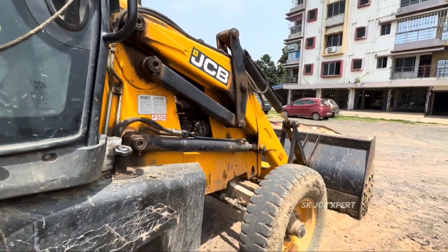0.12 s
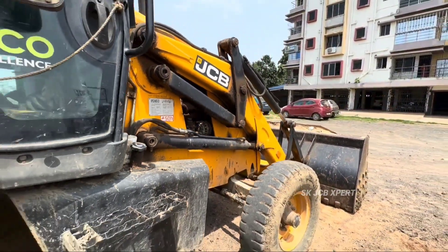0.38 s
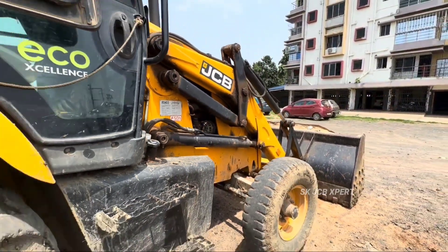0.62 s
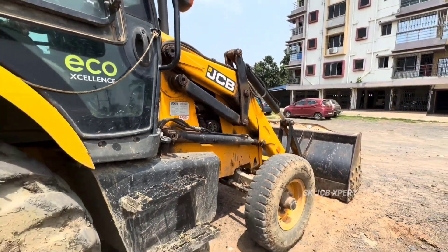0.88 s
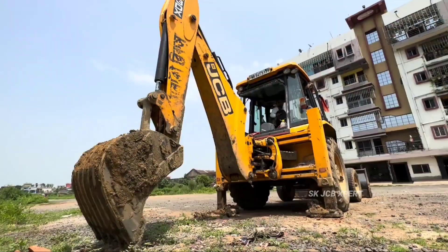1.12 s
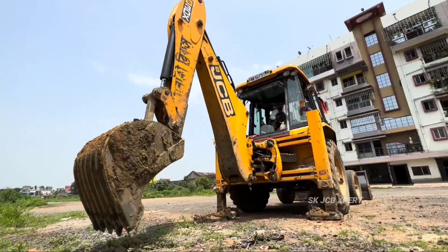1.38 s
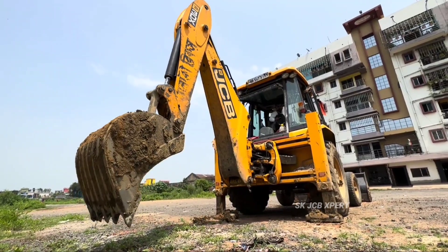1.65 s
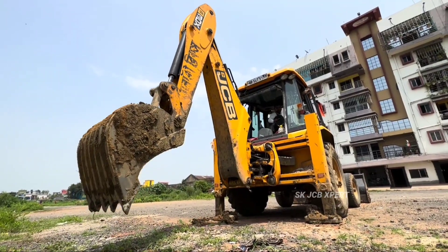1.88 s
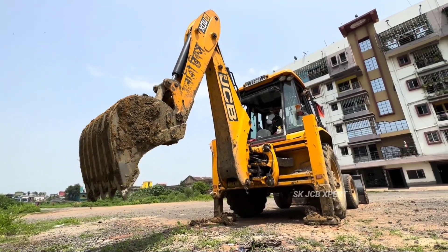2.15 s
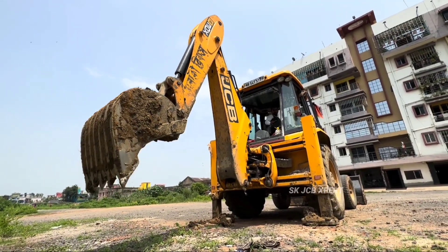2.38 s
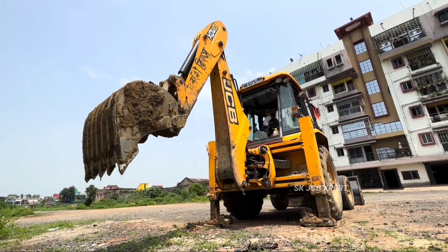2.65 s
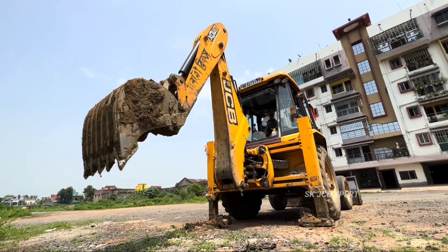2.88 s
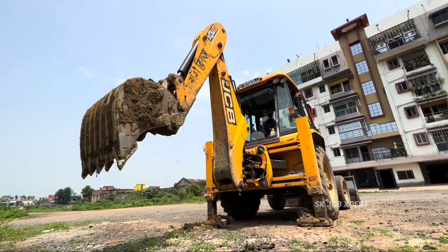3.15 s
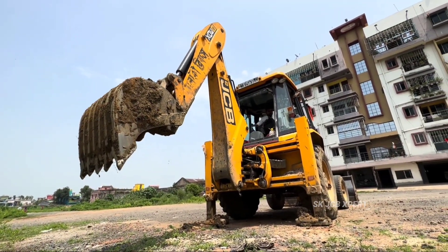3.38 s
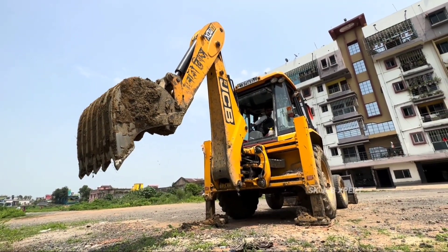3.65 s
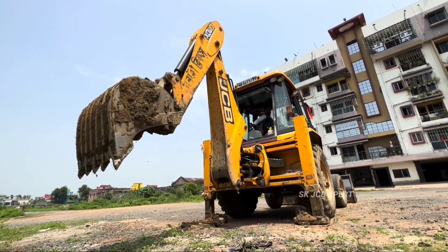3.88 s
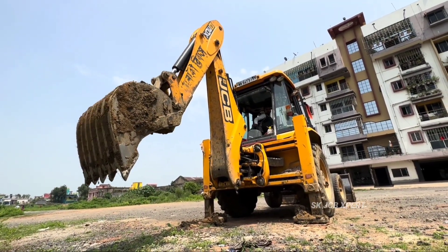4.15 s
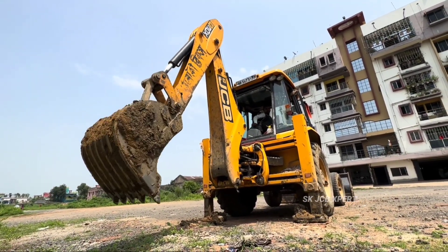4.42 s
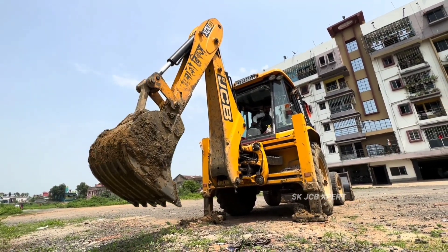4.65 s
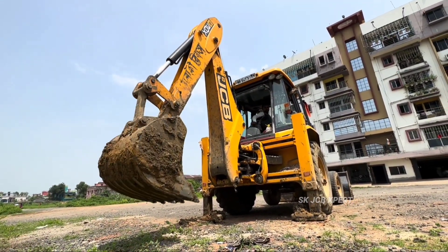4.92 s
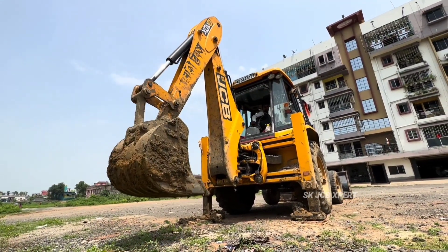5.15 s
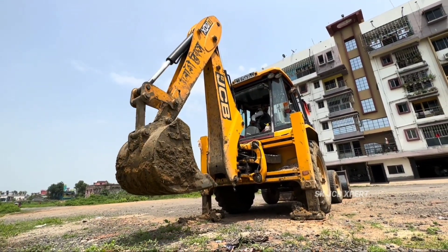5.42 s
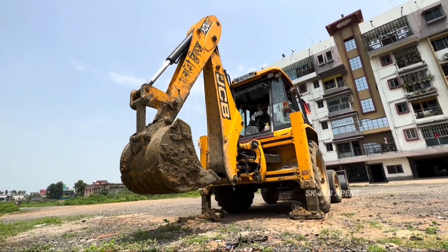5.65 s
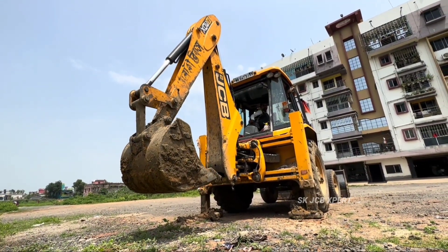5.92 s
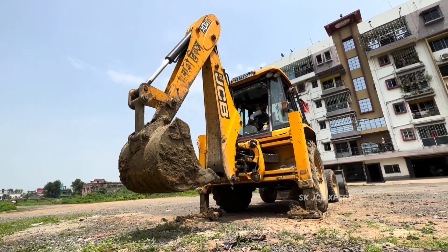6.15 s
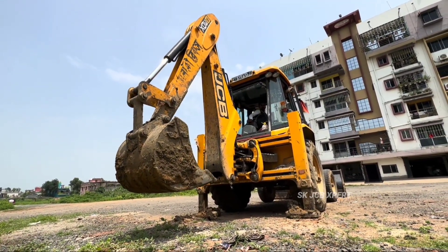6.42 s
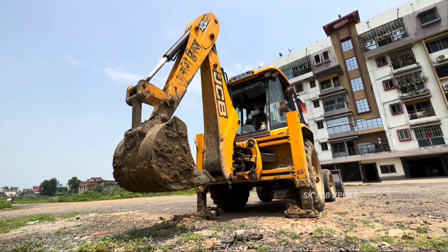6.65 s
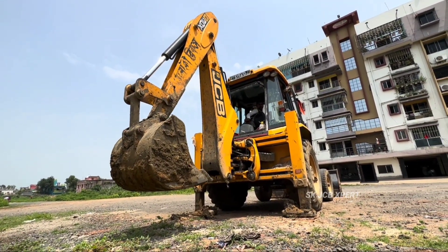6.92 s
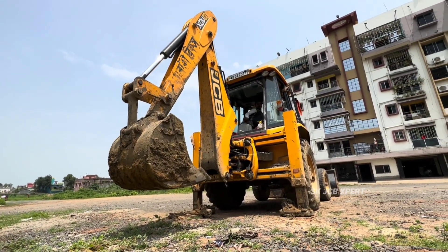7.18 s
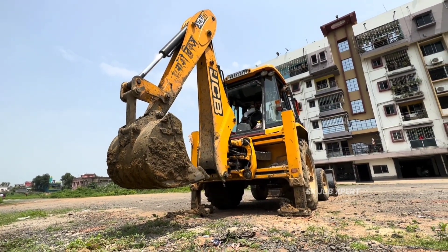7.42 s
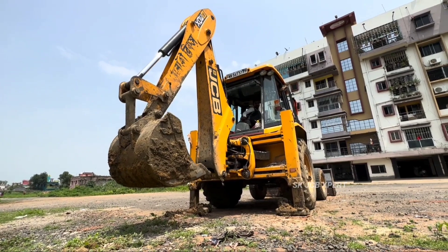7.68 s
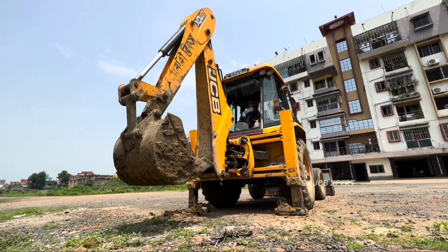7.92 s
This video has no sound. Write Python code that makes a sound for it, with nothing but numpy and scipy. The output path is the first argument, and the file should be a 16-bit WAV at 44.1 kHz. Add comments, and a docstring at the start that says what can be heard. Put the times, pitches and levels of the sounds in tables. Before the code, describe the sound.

Outdoor stereo sound of a diesel backhoe on an open lot. First a close, clattery idle, then a sudden switch to a boomy exhaust drone under load. A tumbling run of muddy steel clangs follows, ending in a short squeak. The engine immediately turns quieter and slightly faster, with a throbbing hydraulic hum for under a second, then steady idling, soft thuds, one pin clink and very faint high chirps.

```python
"""Diesel digger dropping its bucket

A four-cylinder digger idles on an open lot, heard beside the engine bay and, after a cut, from behind.
The exhaust is a stack of crank-locked tones, louder and slower while the arm lifts; the block is
noise puffed up by each firing, plus panels that ring once a cycle. The bucket bangs as noise bursts
through steel modes and rattles; a throbbing tone hums in the hydraulics; decaying sines make rings,
squeaks, thuds, a pin's clink and faint high chirps."""
import sys
import numpy as np
from scipy import signal
from scipy.fft import rfft, irfft, next_fast_len
from scipy.io import wavfile
from scipy.ndimage import uniform_filter1d

SR = 44100
rng = np.random.default_rng(int(sys.argv[2]) if len(sys.argv) > 2 else 0)


def to_wav(s):
    """Save 16-bit WAV."""
    ch = np.atleast_2d(s).T  # columns
    pcm = np.round(np.clip(ch, -1, 1) * 32767)  # PCM
    wavfile.write(sys.argv[1], SR, pcm.astype(np.int16))


def gain_from_db(level_db):
    """Convert decibel levels to linear amplitude factors (20 dB per decade)."""
    decades = np.asarray(level_db, float) / 20
    return 10 ** decades


N = 355005
T = np.arange(N) / SR
FFT_SIZE = next_fast_len(N)
BINS = np.maximum(np.fft.rfftfreq(FFT_SIZE, 1 / SR), 1)  # Hz
CYCLE = 4  # firings per engine cycle


def over_hz(rows):
    """A (hz, value) table on the frequency bins, straight between points on a log axis."""
    hz, value = np.transpose(rows)
    return np.interp(np.log(BINS), np.log(hz), value)


def shaped(x, gain):
    """Filter by a gain per frequency bin."""
    return irfft(rfft(x, FFT_SIZE) * gain, FFT_SIZE)[..., :N]


def ring(x, hz, width_hz):
    """Two-pole resonance, gain 1 at the centre."""
    return signal.lfilter(*signal.iirpeak(hz, hz / width_hz, SR), x)


def level(x, rms_db):
    """Set the rms."""
    return x * gain_from_db(rms_db) / np.sqrt(np.mean(x ** 2))


def per_firing(crank, every=1):
    """A random value with a new target once in so many firings, gliding between targets."""
    return np.interp(crank / every, np.arange(400), rng.standard_normal(400))


def partial(s, hz, db, attack_s, t60_s, waver):
    """One ringing partial that swells briefly and dies, its pitch wavering at random."""
    out, i = np.zeros(N + SR), int(s * SR)
    t = T[:SR // 2]
    wobble = np.cumsum(uniform_filter1d(rng.standard_normal(len(t)), size=200)) * hz * waver
    envelope = gain_from_db(db - 60 * t / t60_s) * np.minimum(t / attack_s, 1)
    out[i:i + len(t)] = envelope * np.sin(2 * np.pi * hz * t + wobble)
    return out[:N]


# faint high chirps: start_s, pitch_hz, level_db
CHIRPS = [(7.265, 8750, -52), (7.33, 8800, -48), (7.424, 8900, -47)]


def chirps():
    """Faint, softly swelling high partials."""
    return sum(partial(s, hz, db, .011, 0.12, 2.5e-5) for s, hz, db in CHIRPS)


# dull thuds in the frame: start_s, pitch_hz, level_db, t60_s
THUDS = [(3.247, 197, -16.5, 0.2), (5.02, 200, -26.5, 0.59), (5.975, 147, -19.5, 0.13)]


def thuds():
    """Low partials with a soft attack."""
    return sum(partial(s, hz, db, 0.0071, t60_s, 8e-6) for s, hz, db, t60_s in THUDS)


# modes of the one pin that clinks: pitch_hz, level_db, t60_s
PIN = [(1643, -29, 0.048), (3240, -39.5, 0.17), (3402, -51, .3), (4802, -46, 0.068), (6400, -44, 0.052)]
PIN_S = 5.981


def pin_clink():
    """All modes of the pin start together, each dying at its own pace."""
    return sum(partial(PIN_S, hz, db, 0.0013, t60_s, 8e-6) for hz, db, t60_s in PIN)


# squeaks of the joints: start_s, pitch_hz, level_db, upper_pitch_hz, upper_level_db
SQUEAKS = [(3.228, 5240, -28, 7300, -42), (3.393, 5770, -38, 6400, -46)]


def squeaks():
    """Two high partials per squeak, the upper one speaking sooner."""
    out = 0
    for s, hz, db, upper_hz, upper_db in SQUEAKS:
        out = out + partial(s, hz, db, 0.013, 0.056, 1.2e-5)
        out = out + partial(s, upper_hz, upper_db, .006, .06, 1.2e-5)
    return out


# broad ticks of contact with squeak and clink: start_s, level_db (before the filter), t60_s
TICKS = [(3.228, -39.5, 0.1), (5.98, -41, .05)]


def ticks():
    """Short swells of broad, bright noise."""
    envelope = 0
    for s, db, t60_s in TICKS:
        decay = gain_from_db(db - 60 * np.clip(T - s, 0, 1) / t60_s)
        envelope = envelope + decay * np.clip((T - s) / 0.0088, 0, 1)
    return envelope * ring(rng.standard_normal(N), 9000, 16000)


# clear rings of the bucket among the blows: start_s, pitch_hz, level_db
RINGS = [(2.863, 2130, -18), (2.954, 1720, -24), (2.953, 1100, -20), (3.016, 1540, -23.5)]


def bucket_rings():
    """Fast-attack partials that stand out of the bangs."""
    return sum(partial(s, hz, db, 0.0014, 0.06, 2e-5) for s, hz, db in RINGS)


FLOW_START_S, FLOW_END_S = 3.39, 4.16


def flowing():
    """1 while oil flows through the hoses, with soft ends."""
    return uniform_filter1d(((T > FLOW_START_S) & (T < FLOW_END_S)) * 1., size=3000)


PUMP_ORDER = 12  # multiple of the firing rate
HUM_DB, HUM_LOW_DB = -38.5, -2.5  # rms at the throb's top; octave below relative to the tone
THROB_HZ, THROB_DB, THROB_TOP_S = 3.48, 7.5, 3.52  # rate, depth, time of one top


def hum(crank):
    """Pump pulsation in the hoses: a throbbing, uneven tone and the octave below."""
    phase = 2 * np.pi * PUMP_ORDER * crank + 0.33 * per_firing(crank, every=1.5)
    dip_db = THROB_DB * np.sin(np.pi * THROB_HZ * (T - THROB_TOP_S)) ** 4
    dip_db += 2.0 * per_firing(crank, every=1.1)
    tone = gain_from_db(-dip_db) * np.sin(phase)
    octave_below = gain_from_db(HUM_LOW_DB) * np.sin(phase / 2)
    return flowing() * np.sqrt(2) * gain_from_db(HUM_DB) * (tone + octave_below)


# bucket blows, before dulling and panning:
# start_s, peak_db (of the body), treble_db (crack relative to the body), rattle_s (decay time)
BLOWS = [(2.863, -11.5, -10.5, 0.023), (2.892, -15, -24, 0.019), (2.951, -16.5, -28, 0.016),
         (2.975, -15, -14, 0.025), (3.014, -16.5, -29, 0.016), (3.04, -21.5, -20, 0.014),
         (3.061, -23.5, -21, 0.016), (3.102, -21.5, -15.5, 0.03), (3.183, -23, -17, 0.027),
         (3.23, -22.5, -11, 0.055)]
# the bucket's strongest modes: pitch_hz, level_db (relative, scattered per blow), t60_s
BUCKET = [(154, -14, 0.18), (200, 1, 0.16), (265, -3, 0.17), (448, -6, 0.51), (690, -4, 0.14),
          (1004, -4.5, 0.18), (1529, -20, 0.057), (1820, -8, 0.083), (2150, -26, 0.046),
          (2260, -18.5, 0.043), (2972, -31, 0.037)]
PLATE_DB = -5  # the many plate modes, relative to the outline of the strong ones
# loose parts: level for a 0 dB blow, dB per dB of blow, decay
LOOSE_DB, LOOSE_FOLLOWS, LOOSE_T60_S = -24, 0.5, 0.13


def bucket_modes():
    """Levels and decaying sines of the strong modes and of 160 weaker plate modes between them."""
    t = np.arange(SR // 3) / SR
    hz, db, t60_s = np.transpose(BUCKET)
    plate_hz = np.sort(hz[0] * (hz[-1] / hz[0]) ** rng.random(size=160) ** 0.53)
    all_db = np.append(db, np.interp(plate_hz, hz, db) + PLATE_DB)
    all_t60_s = np.append(t60_s, np.interp(plate_hz, hz, t60_s))
    sines = np.sin(2 * np.pi * np.outer(np.append(hz, plate_hz), t))
    return all_db, sines * gain_from_db(-60 * t / all_t60_s[:, None])


def loose_rattle():
    """Loose pins and dirt: grainy noise that jumps up with each blow and dies."""
    grain_db = 2.2 * np.repeat(rng.exponential(size=N // 100 + 1), 100)[:N]
    grains = rng.standard_normal((2, N)) * gain_from_db(grain_db)
    loose = ring(ring(grains, 450, 750), 600, 1800)
    power = 0
    for s, peak_db, *_ in BLOWS:
        decay_db = 60 * np.clip(T - s, 0, 1) / LOOSE_T60_S
        power = power + (T > s) * gain_from_db(LOOSE_DB + LOOSE_FOLLOWS * peak_db - decay_db) ** 2
    return level(loose, 0) * np.sqrt(power)


def bucket():
    """Each blow is a burst of rattling contact that rings the bucket, with a crack of treble."""
    n = SR // 3
    t = np.arange(n) / SR
    mode_db, modes = bucket_modes()
    out = np.zeros((2, N + n))
    for s, peak_db, treble_db, rattle_s in BLOWS:
        push = rng.standard_normal((2, n)) * np.exp(-t / rattle_s) * np.minimum(t / 0.001, 1)
        body = gain_from_db(mode_db + 3 * rng.standard_normal(len(mode_db))) @ modes
        late_push = push * np.minimum(t / 0.0086, 1)  # the body answers late
        rung = signal.fftconvolve(late_push, body[None])[:, :n]
        rung /= np.abs(rung[0]).max()
        crack = ring(ring(push, 2000, 3700), 2100, 5000)
        crack /= np.abs(crack[0]).max()
        i = int(s * SR)
        out[:, i:i + n] += gain_from_db(peak_db) * (rung + gain_from_db(treble_db) * crack)
    mud = signal.butter(2, 5000, fs=SR, output="sos")  # mud on the steel dulls the top
    return signal.sosfilt(mud, out[:, :N] + loose_rattle())


# panels that one cylinder or valve rings once a cycle, beside and behind:
# pitch_hz, pitch_spread_hz, rms_db (before load and panning), place_firings (in the cycle), length_firings
KNOCK_SIDE = [(2660, 120, -53, 2.15, 0.21), (2360, 83, -54, 0.13, 0.22), (693, 43, -53, 1.3, 0.42),
              (1320, 70, -62, 0.11, 0.2), (1840, 120, -54, 1.8, 0.33), (4310, 150, -65.5, 2.4, 0.3),
              (462, 36, -51.5, 2.93, 0.99), (1044, 60, -52, 0.97, 0.58)]
KNOCK_REAR = [(1002, 17, -49.5, 2.87, 1), (2137, 57, -61, 0.065, 0.29), (689, 50, -57, 0.29, 0.66),
              (663, 50, -60.5, 1.1, 0.4), (726, 50, -56.5, 1.95, 0.48), (4290, 150, -72.5, 0.11, 0.37),
              (5720, 140, -75, 1.8, 0.31), (3340, 160, -77, 2.3, 1), (1170, 170, -62.5, 0.055, 0.4),
              (1650, 49, -61.5, 2.5, .3)]


def knocks(crank, panels):
    """Once a cycle each panel rings up and dies, its pitch a little different every time."""
    out = np.zeros((2, len(crank)))
    for hz, spread_hz, rms_db, place, length in panels:
        turn, since = np.divmod(crank - place + CYCLE, CYCLE)
        chance = rng.standard_normal((400, 4))[turn.astype(int)].T  # size, pitch, two phases
        burst = since / length * np.exp(-2 * since / length) * gain_from_db(3.1 * chance[0])
        turns = (hz + spread_hz * chance[1] / 2) * T[:len(crank)] + chance[2:]
        out += level(burst * np.sin(2 * np.pi * turns), rms_db)
    return out


def cyclic(crank, share):
    """Noise of which a share repeats every engine cycle, as the same parts strike in the same order."""
    steps = 1360  # per firing
    pattern = rng.standard_normal((2, CYCLE * steps))[:, (crank % CYCLE * steps).astype(int)]
    return np.sqrt(share) * pattern + np.sqrt(1 - share) * rng.standard_normal((2, N))


# colour of clatter, fan and rumble between the tones, beside and behind: freq_hz, density_db (per Hz, relative)
BLOCK_SIDE = [(18, -25), (45, -29), (95, -12), (150, -7), (315, -9), (398, -17.5), (559, -8.5),
              (871, -15.5), (1290, -9), (2120, -18), (2700, -23), (3500, -29.5), (9600, -39), (15400, -40)]
BLOCK_REAR = [(18, -26), (40, -15.5), (85, -6.5), (144, -8.5), (270, -13), (480, -23.5), (849, -24.5),
              (1050, -22.5), (2010, -28.5), (2300, -26), (2800, -35.5), (3400, -42), (9600, -51),
              (15400, -57)]
BLOCK_SIDE_DB, BLOCK_REAR_DB = -36.5, -34  # rms before puffs, rumble lift and panning
# resonances of block and covers on that colour, beside and behind: freq_hz, width_hz, lift_db
RING_SIDE = [(724, 110, 4), (1370, 240, -0.5), (2590, 250, 9.5), (4540, 60, -2), (4720, 210, 5),
             (5660, 110, 4)]
RING_REAR = [(593, 170, 3), (890, 78, -3), (998, 40, 6.5), (1145, 35, 4.5), (1650, 130, 0.5),
             (2090, 200, -9), (2160, 35, 12), (2205, 31, -3.5), (4260, 25, 4), (5610, 70, 10.5),
             (6330, 120, 4)]


def clatter(crank, colour, rings, rms_db, low_db, depth, scatter_db, alike):
    """Octave bands of noise that each firing puffs up, most around 1900 Hz, every band by its own chance."""
    colour_db = over_hz(colour)
    for hz, width_hz, lift_db in rings:
        colour_db = colour_db + lift_db / (1 + (2 * (BINS - hz) / width_hz) ** 2)
    # the rumble never repeats; the clatter above it partly does
    rumble, strikes = rfft(cyclic(crank, 0), FFT_SIZE), rfft(cyclic(crank, alike), FFT_SIZE)
    noise = np.where(BINS < 400, rumble, strikes) * gain_from_db(colour_db)
    puff = np.exp(-((crank - .08) % 1) / .28)
    puff = uniform_filter1d(puff / puff.mean(), size=160)
    out = 0
    for octave in range(9):
        hz = 50 * 2 ** octave
        window = np.cos(np.pi / 2 * np.clip(np.log2(BINS / hz), -1, 1)) ** 2
        band = irfft(noise * window, FFT_SIZE)[:, :N]
        share = depth * np.exp(-.5 * (np.log2(hz / 1900) / 2.33) ** 2)
        chance = gain_from_db(scatter_db * per_firing(np.floor(crank - .08))) ** 2
        gain = np.sqrt(1 - share + share * puff * chance)
        drift_db = 0.73 * per_firing(crank, every=3.5)
        out = out + band * gain * gain_from_db(low_db * (hz < 350) + drift_db)
    return out * gain_from_db(rms_db) / np.std(irfft(noise[0], FFT_SIZE))


# stereo width, beside and behind: freq_hz, side_minus_mid_db
WIDTH_SIDE = [(60, -20), (110, -13), (200, -21), (380, -7), (700, -5), (1290, -3), (2380, -2.5), (4390, 1),
              (8100, -1), (10300, 4), (15000, -7.5)]
WIDTH_REAR = [(60, -6.5), (110, -7), (200, -13.5), (380, -4.5), (700, -4.5), (1290, 0), (2380, -2.5),
              (4390, 0), (8100, -1.5), (10300, 4), (12500, 8), (15000, -18)]
# stereo balance, beside and behind: freq_hz, left_minus_right_db
PAN_SIDE = [(60, -7), (110, 8), (200, -5), (380, 1), (700, 4.5), (1290, 2), (2380, -2), (4390, 2),
            (8100, -1), (15000, -1)]
PAN_REAR = [(60, 3), (110, 2), (200, -4), (380, -1.5), (700, -4.5), (1290, -3.0), (2380, -1.5), (4390, 3),
            (8100, -2.5), (15000, -1)]


def spread(mid, side, width, pan, lead):
    """Left and right from shared and unshared sound; lead (-1..1) turns the left ahead in phase."""
    lead = lead / np.sqrt(1 + BINS / 2500)  # fades toward the treble
    width_gain = gain_from_db(over_hz(width))
    side = shaped(side, np.sqrt(1 - lead ** 2) * width_gain) + shaped(mid, 1j * lead * width_gain)
    return shaped(np.array([mid + side, mid - side]), gain_from_db(np.outer([.5, -.5], over_hz(pan))))


# exhaust and engine tones: order (multiple of the firing rate)
ORDERS_HEARD = [1, 1.5, 1.75, 2, 2.5, 2.75, 3, 3.5, 4, 5, 6, 8, 9.75, 10, 15.4, 18]
# their rms levels, one row per order: beside_db, behind_loaded_db, behind_idle_db
ORDERS_DB = [(-52, -46, -47), (-60, -54, -56), (-56, -57, -57), (-45, -27, -31), (-52, -44, -45),
             (-55, -47, -49), (-35, -21, -32), (-52, -38, -50), (-47, -54, -58), (-51, -44, -46),
             (-51, -36, -51), (-65, -57, -47), (-64, -50, -51), (-55, -62, -54), (-68, -53, -64),
             (-68, -57, -64)]


def exhaust(crank, order_db, scatter_db, lag):
    """Steady tones on the crank; uneven firings make each waver, the right side lag radians ahead."""
    out = 0
    for order, db in zip(ORDERS_HEARD, order_db):
        # these offsets against order 2 leave two crests and a dip per firing
        phase = 2 * np.pi * order * crank + 1.27 * abs(order - 2) + .45 * (order > 2)
        phase += 0.064 * per_firing(crank, every=1.9)
        size = np.sqrt(2) * gain_from_db(db + scatter_db * per_firing(crank, every=0.98))
        out = out + size * np.cos(phase + np.array([[-lag], [lag]]) / 2)
    return out


CUT_S = 1.219
IDLE_HZ = 32.18  # firing rate beside the engine
START_SIDE, START_REAR = 3.53, 3.332  # place in the cycle where each view begins, firings


def beside_engine():
    """The view beside the engine bay: exhaust, clatter and knocks at a steady idle."""
    crank = START_SIDE + IDLE_HZ * T
    early, pad = crank[T < CUT_S], ((0, 0), (0, np.sum(T >= CUT_S)))
    tones = exhaust(early + 0.415, np.array(ORDERS_DB)[:, 0], scatter_db=1.6, lag=0.035)
    block = clatter(crank, BLOCK_SIDE, RING_SIDE, BLOCK_SIDE_DB, 0, depth=0.59, scatter_db=0.9, alike=0.52)
    block += np.pad(knocks(early, KNOCK_SIDE), pad)
    return np.pad(tones, pad) + spread(*block, WIDTH_SIDE, PAN_SIDE, lead=.6)


# engine speed behind: sags under load, overshoots when the load drops, settles at idle: time_s, firing_hz
SPEED = [(1.22, 30.801), (2.75, 30.651), (3.1, 30.097), (3.42, 32.999), (3.8, 32.79), (4.3, 32.361),
         (7.2, 32.361), (8.06, 32.196)]
# the lift ends; its load falls within this time to a share (0-1) that lasts while oil still flows
LIFT_ENDS_S, UNLOAD_S, FLOW_LOAD = 3.23, 0.063, .12
# rumble in the octave bands below 350 Hz: lift at the first blow, its decay time, lift while oil flows
JOLT_DB, JOLT_S, FLOW_RUMBLE_DB = 13, 0.39, 0.5


def behind_digger():
    """The view from behind: load slows the engine, raises or lowers each order and softens the knocks."""
    firing_hz = np.interp(T, *np.transpose(SPEED)) * (T > SPEED[0][0])
    crank = START_REAR + np.cumsum(firing_hz) / SR
    load = np.clip(1 - (T - LIFT_ENDS_S) / UNLOAD_S, 0, 1)
    load = np.maximum(load, FLOW_LOAD * (T < FLOW_END_S))
    _, loaded_db, idle_db = np.array(ORDERS_DB).T[:, :, None]
    order_db = idle_db + (loaded_db - idle_db) * load
    tones = exhaust(crank, order_db, scatter_db=0.8 - 0.49 * load, lag=0.22)
    since = T - BLOWS[0][0]
    rumble_db = JOLT_DB * (since > 0) * np.exp(-np.abs(since) / JOLT_S) + FLOW_RUMBLE_DB * flowing()
    works = clatter(crank, BLOCK_REAR, RING_REAR, BLOCK_REAR_DB, rumble_db,
                    depth=0.42, scatter_db=1.5, alike=0.59)
    works += gain_from_db(-5.5 * load) * knocks(crank, KNOCK_REAR)
    works += bucket()
    metalwork = chirps() + thuds() + pin_clink() + squeaks() + ticks() + bucket_rings()
    return tones + spread(*works, WIDTH_REAR, PAN_REAR, lead=-0.55) + metalwork + hum(crank)


def scene():
    """Two viewpoints joined by a cut; the second fades in over 35 ms."""
    beside = beside_engine() * np.clip((CUT_S - T) / .002, 0, 1)
    return beside + behind_digger() * np.clip((T - CUT_S) / 0.035, 0, 1)


def band_limit(x):
    """A steep low-pass at the top of the band."""
    return signal.sosfilt(signal.butter(12, 15560, fs=SR, output="sos"), x)


def record(dry):
    """A deep gap is heard in the high treble, from 10.4 to 12.4 kHz."""
    gap = signal.ellip(8, .3, 45, [10350, 12450], "bandstop", fs=SR, output="sos")
    mix = signal.sosfilt(gap, dry)
    return band_limit(mix)


dry = scene()
out = record(dry)
to_wav(out)
```